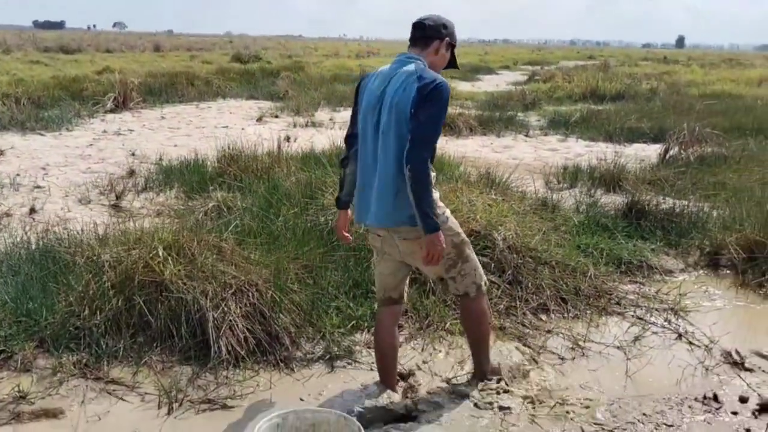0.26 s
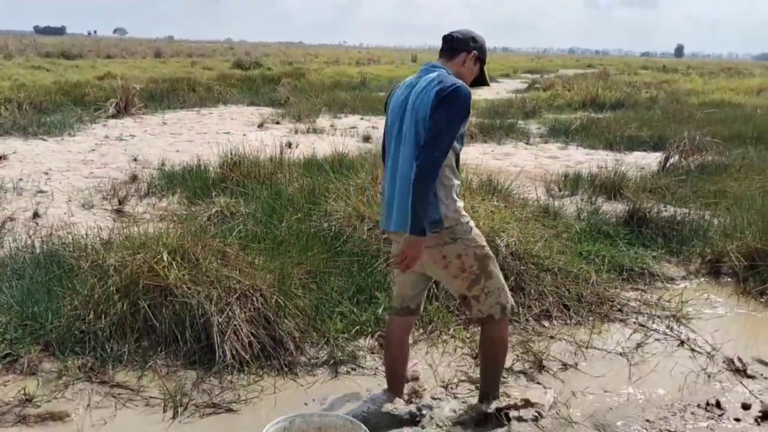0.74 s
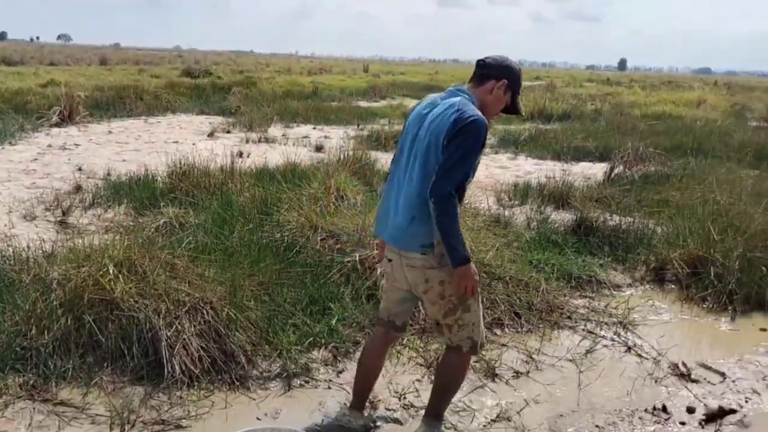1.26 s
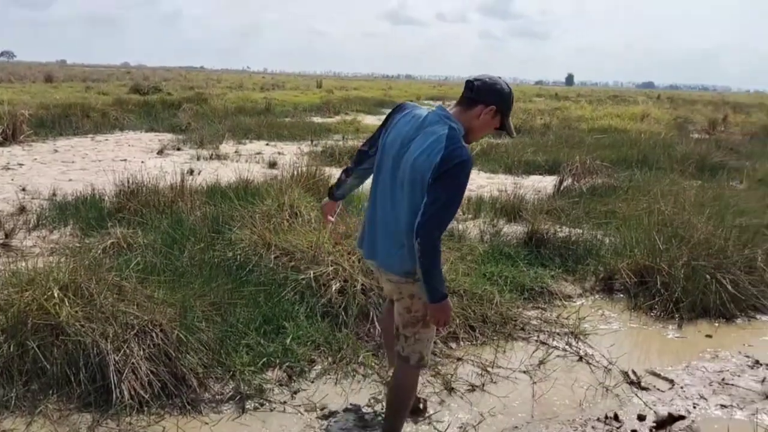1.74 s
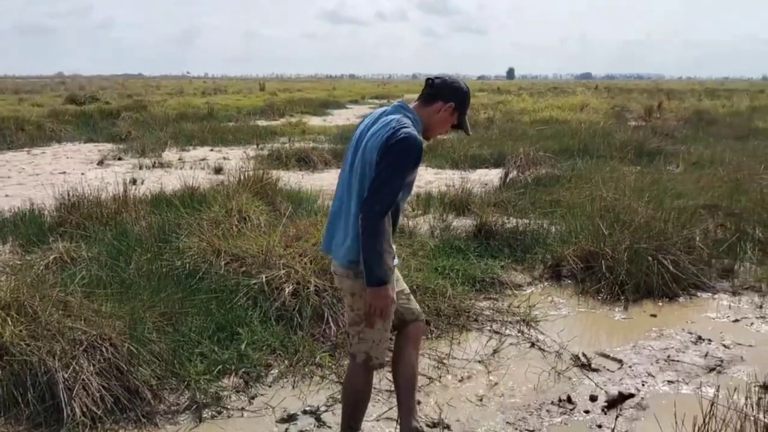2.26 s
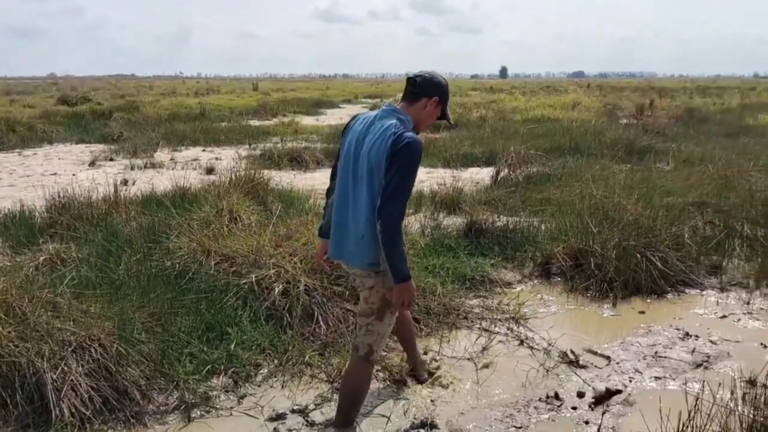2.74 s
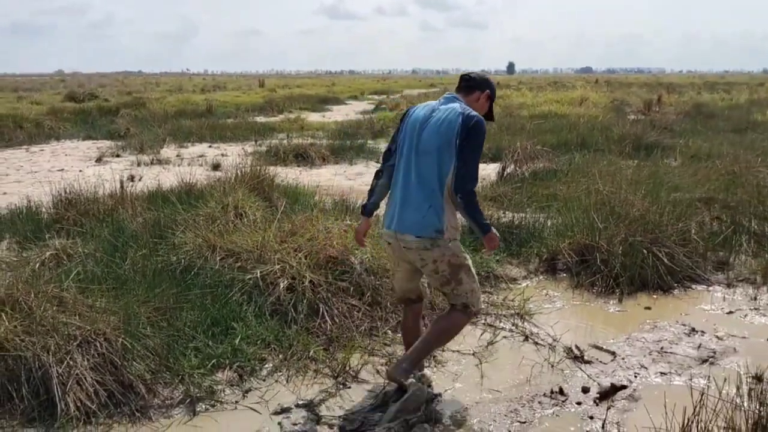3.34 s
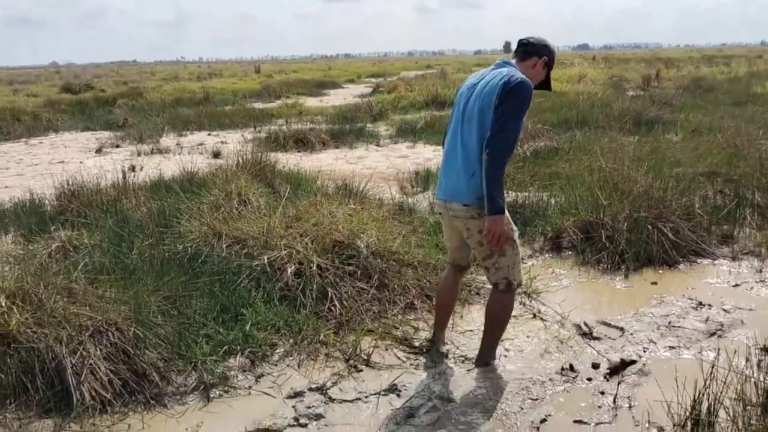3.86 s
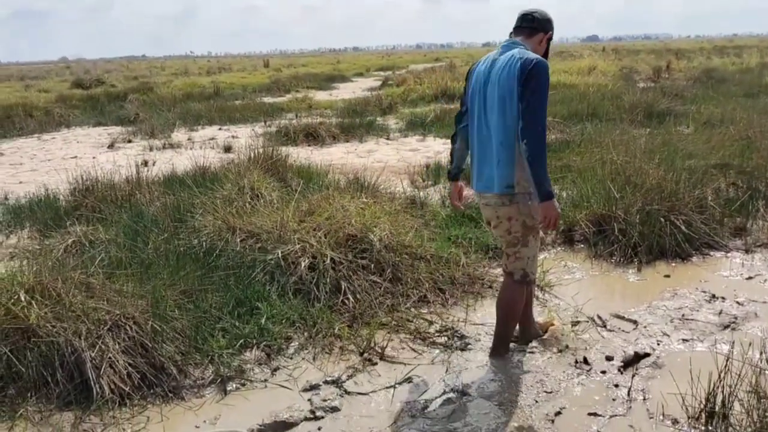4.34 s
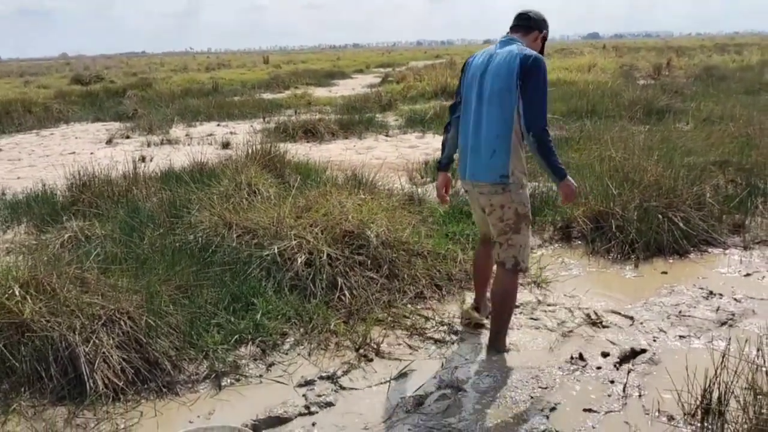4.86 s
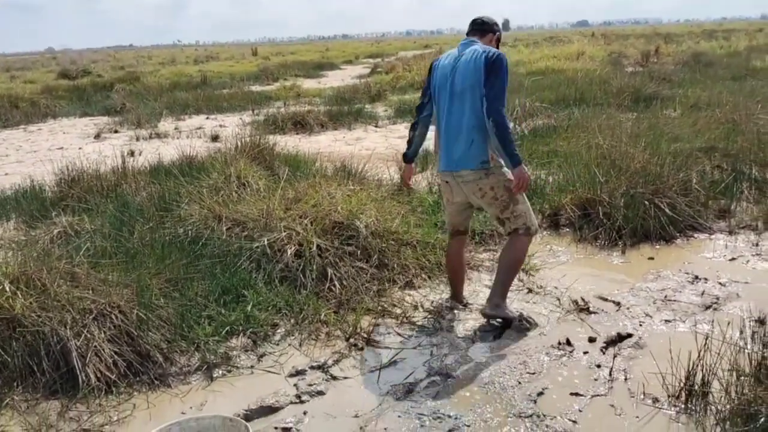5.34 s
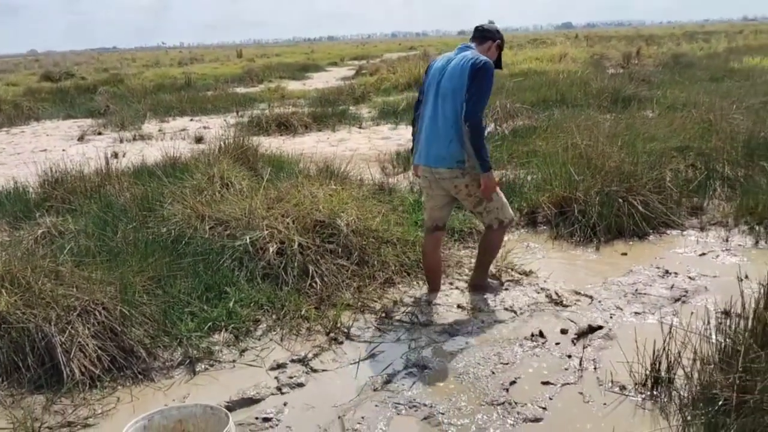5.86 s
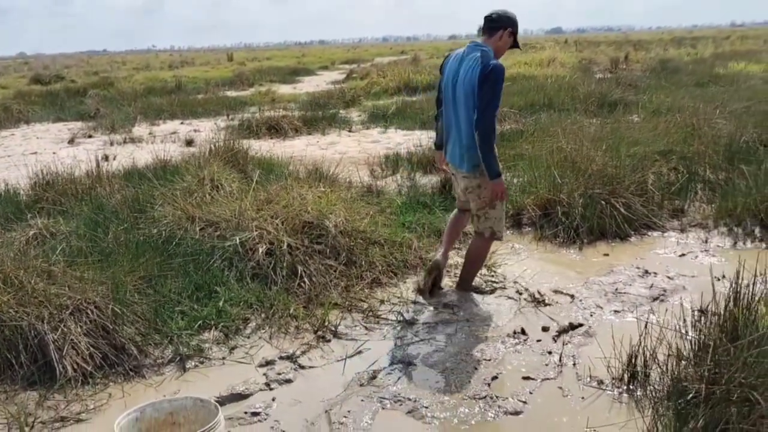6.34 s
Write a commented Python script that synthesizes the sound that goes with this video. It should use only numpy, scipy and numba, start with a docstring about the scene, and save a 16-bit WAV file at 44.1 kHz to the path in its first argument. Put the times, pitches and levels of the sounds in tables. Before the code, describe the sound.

Bare feet wade through shallow muddy water with irregular sloshes, bubbly gulps and drips, while wind rumbles and thumps on the microphone and birds chirp faintly.

```python
"""Wading in an open marsh

Bare feet wade through shallow mud, a few metres from a hand-held phone with two microphone ports.
Pushes through the water raise swarms of ringing bubbles over noise foam, with single pockets, drips and smacks.
Far off, small birds call in gliding near-sine notes. Wind presses on each port as separate bands of noise,
thumps single ports, and twice whistles across the right one as a wavering tone. A faint hiss lies beneath."""
import sys
import numpy as np
from scipy import signal
from scipy.fft import rfft, irfft
from scipy.io import wavfile
from scipy.ndimage import uniform_filter1d
from numba import njit

SR = 44100
rng = np.random.default_rng(int(sys.argv[2]) if len(sys.argv) > 2 else 0)


def waveform_to_disk(signal):
    """Save audio, clipped to [-1, 1], as 16-bit WAV at the path in sys.argv[1]."""
    frames = np.transpose(np.atleast_2d(signal))
    scaled = np.clip(frames, -1, 1) * 32767
    samples = np.round(scaled).astype(np.int16)
    wavfile.write(sys.argv[1], SR, samples)


N = 291501

# Spectrum of the faint hiss: f/Hz, level/dB per Hz (relative)
HISS_SPECTRUM = [(410, -17), (700, 1), (767, -24), (2890, -23.5), (5540, -16), (6310, -17), (15700, -14.5)]
# Spectrum of the wind pressing on a port: f/Hz, level/dB per Hz (relative)
WIND_SPECTRUM = [(8.8, -46), (15, -6), (43, 3.5), (69, 1.5), (119, -6), (200, -19.5), (260, -31),
                 (440, -120)]
# Wind on each port, left then right: t/s, rumble level/dB, buffeting against the rumble/dB
GUSTS = [
    [(0, -35.5, -3.5), (.25, -31, -3.5), (.37, -44.5, -7), (.5, -41, -6), (.65, -43.5, -6), (.8, -32.5, -8),
     (1.15, -30, -5.5), (1.9, -33.5, -4.5), (2.15, -43.5, -2), (2.4, -34.5, -4), (2.55, -39, -5),
     (3.3, -38.5, -8.5), (3.65, -51, -6), (3.85, -58.5, 7), (4.05, -43, -7), (4.3, -47, -19),
     (4.45, -40, -2), (4.85, -36.5, -5), (5.05, -37, -11), (5.35, -52, -4.5), (5.75, -42, -11),
     (5.95, -35, -1), (6.2, -31.5, -3.5), (6.61, -38.5, -4.5)],
    [(0, -36.5, -2.5), (.37, -47.5, -4.5), (.5, -30, 1), (.57, -30, -1.5), (.64, -31.5, 4.5), (.71, -33, 3),
     (.77, -36, 1.5), (.87, -34, 3), (1.0, -31.5, 0), (1.5, -38, 0), (2.05, -33.5, -9), (2.37, -41.5, -5),
     (2.55, -29.5, -6), (2.8, -37.5, -10.5), (3.22, -39.5, -7.5), (3.35, -31.5, -7), (3.55, -45, -15),
     (3.92, -42.5, -12), (4.0, -32, -4.5), (4.2, -37.5, -6.5), (4.6, -37, -2), (5.0, -36, -10),
     (5.19, -41.5, -8), (5.27, -48, -4), (5.57, -39.5, -11.5), (5.66, -32, -8), (5.9, -33.5, -5),
     (6.05, -36.5, -5), (6.45, -34.5, -9.5), (6.55, -24, 5), (6.585, -27, -3), (6.6, -46, -2)],
]
# Two whistles at the right port, before wavering: t/s, f/Hz, level/dB
WHISTLES = [
    [(0.33, 175, -47.5), (0.392, 192, -50.5), (0.442, 210.4, -54), (0.48, 240, -43)],
    [(1.07, 311.3, -48), (1.214, 329.6, -44), (1.236, 280.3, -39.5), (1.3, 274, -43.5), (1.344, 303, -44),
     (1.414, 313, -47), (1.44, 282, -47), (1.5, 305.6, -45.5), (1.52, 341, -69)],
]
# Partials of the whistle, from the fundamental up: level/dB
WHISTLE_PARTIALS_DB = [-0.5, -12.5, -29]
# Single eddies that thump one port: port (0 left, 1 right), t/s, peak level/dB, f/Hz, swell/ms
PUFFS = [(0,.497,-22,100,7.3),(0,0.82,-23,86,7.2),(0,1.158,-17.5,82,6),(0,1.591,-22,100,5.2),(0,1.792,-27,66,9.5),(0,4.807,-21,98,5.7),
         (0,6.071,-20,116,6.3),(0,6.166,-16.5,102,7.2),(1,.4946,-29,285,2.6),(1,0.55,-20,80.5,8.2),(1,.6116,-27,241,8.4),(1,0.6,-26,104,6),(1,.68,-34,427,4.2),
         (1,.8599,-26.5,367,5.4),(1,1.021,-19.5,96,8),(1,1.0679,-30.5,322,3.7),(1,1.2221,-33,318,3.3),(1,2.083,-18.5,73,9.2),
         (1,2.542,-11,84.7,7.1),(1,2.605,-17.5,103,8),(1,2.732,-21,74,7),(1,3.689,-33,85,8),(1,3.99,-19.5,77,6.1),(1,5.179,-24,96,6.2),
         (1,5.667,-18.5,82,9.9),(1,5.862,-18,74,8),(1,5.977,-20,80,7.4),(1,6.319,-17.5,72.5,8.4),(1,6.525,-28,228,3.8),(1,6.5518,-19,200,11),(1,6.556,-30,345,6),(1,6.585,-25,297,4.2),(1,6.557,-7,117,8.6)]
# Pitch pattern of each kind of bird note: share of the note length, f/Hz (before a small random shift)
NOTES = {"fall": [(0, 6950), (.3, 5950), (1, 5250)], "hook": [(0, 4050), (.6, 4430), (.72, 3900),
         (1, 3000)], "drop": [(0, 5230), (.4, 4730), (1, 3200)], "slide": [(0, 5500), (1, 4800)],
         "tick": [(0, 4480), (.5, 5030), (1, 4550)], "dip": [(0, 7200), (1, 6100)], "high": [(0, 8300),
         (.45, 6940), (1, 6400)]}
# Length of each kind of bird note: length/s
NOTE_S = {"fall": .04, "hook": .033, "drop": 0.018, "slide": 0.05, "tick": 0.012, "high": .039, "dip": .022}
# Calls of each kind of note: t/s, level/dB (before roughening)
CALLS = { "fall": [(.665, -64), (.835, -64.5), (1.012, -62), (1.163, -67), (1.322, -66), (1.476, -67),
         (1.64, -64)], "slide": [(2.395, -65)], "drop": [(2.535, -78.5), (2.732, -57), (2.92, -58),
         (3.114, -61)], "hook": [(1.215, -70), (1.418, -64.5), (1.789, -54), (1.975, -53), (2.168, -56),
         (2.36, -59), (2.559, -53.5), (2.755, -52.5), (2.946, -55.5), (3.135, -54.5)],
         "tick": [(2.528, -60), (2.545, -54.5), (2.565, -58), (2.585, -60), (3.222, -71), (2.688, -66.5),
         (2.704, -64), (2.722, -62), (2.892, -59), (2.912, -60), (2.932, -54), (3.058, -59), (3.075, -56),
         (3.094, -63), (3.113, -58), (3.24, -59)], "high": [(5.88, -52.5)], "dip": [(.478, -52.5)]}
# Spectrum of bubbles and foam in the water: f/Hz, level/dB per Hz (relative)
WATER_SPECTRUM = [(180, 11), (300, -15.5), (378, -9.5), (510, -19.5), (643, -6), (810, -0.5), (1070, -10),
                  (1190, -9), (1330, -8.5), (3050, -12.5), (3650, -16.5), (9240, -30.5), (12900, -32.5),
                  (15700, -39.5)]
# Drops that smack the surface: t/s, level/dB, centre f/Hz, bright edge against the body/dB
SMACKS = [(.025, -35.5, 3680, -10), (.083, -38.5, 3930, -15), (.174, -37.5, 3180, -7),
          (0.378, -45.5, 5730, -7), (0.5362, -43, 3500, -16), (.7728, -43.5, 3870, -21),
          (0.884, -40, 3300, -17), (.908, -42, 3820, -9), (0.9403, -36.5, 3700, -7),
          (1.0435, -46, 6000, -16), (1.1672, -50, 5500, -18), (1.27, -54, 6500, -6),
          (1.511, -42.5, 3330, -26), (1.67, -41.5, 3220, -8), (1.732, -44, 3520, -6),
          (1.9505, -47, 3300, 3), (1.9725, -27.5, 3270, -15), (2.086, -45, 3320, -22),
          (2.148, -36, 3560, -30), (2.4598, -39, 4320, -19), (2.5145, -33, 5200, -26),
          (2.7942, -39.5, 4070, -12), (2.81, -41.5, 3650, -11), (3.2982, -42, 3340, -22),
          (3.3872, -38.5, 3280, -14), (3.5944, -39, 3360, -25), (3.627, -36, 4030, -25),
          (3.817, -38, 3120, -9), (4.0427, -45, 3260, -17), (4.2, -42, 3720, -21), (4.2315, -46, 3300, -16),
          (4.2925, -49.5, 3230, -3), (4.554, -38, 6500, -37), (4.7515, -51, 4960, -8),
          (4.827, -46.5, 4870, -4), (4.9796, -48, 3200, -9), (5.0985, -44, 3365, -25),
          (5.127, -42, 4100, -25), (5.1964, -43, 3910, -7), (5.5235, -37.5, 3220, -6),
          (5.584, -39, 3310, -14), (5.658, -38, 3320, -12), (6.3705, -47.5, 3300, -21),
          (6.393, -37.5, 3130, -28), (6.407, -38, 3750, -25)]
# Drips whose cavity closes, so the tone climbs: t/s, peak level/dB, start f/Hz, swell/ms, glide/share per cycle
DRIPS = [(.244, -38.5, 1400, 4.2, .035), (.729, -39.5, 1010, 4.1, 0.044), (1.303, -55, 2180, 3.9, 0.013),
         (1.459, -47.5, 810, 6, 0.034), (2.412, -44.5, 1369, 5.2, 0.024), (2.648, -55, 727, 5.7, 0.049)]
# Large bubbles and deep gulps: t/s, peak level/dB, f/Hz, swell/ms
BUBBLES = [(.0959, -37, 2000, 1.1), (.1185, -38, 2210, 2.4), (.1036, -29.5, 1790, 0.44),
           (.1405, -27, 830, 3.7), (.1667, -29.5, 2100, 1), (.1662, -35, 774, 2.8),
           (.1751, -22.5, 2860, 0.88), (.1032, -37, 503, 1.6), (.1783, -27.5, 333, 3.1),
           (.194, -34, 350, 4.7), (.2208, -39, 780, 3.3), (.7163, -44, 1060, 1.7), (.755, -27.5, 740, 1.46),
           (.7938, -37, 760, 5), (.8548, -31.5, 650, 2.1), (.8877, -36.5, 1010, 1.6),
           (.9212, -34.5, 860, 2.6), (.9492, -32.5, 1780, .81), (.9689, -38.5, 940, 1.7),
           (1.0337, -47, 843, 5.3), (1.131, -46, 920, 1.9), (1.5234, -33.5, 283, 3),
           (1.528, -28, 880, 0.87), (1.632, -36.5, 740, 2.2), (1.6428, -30, 743, 3.6),
           (1.8498, -39, 1680, 1.3), (1.9169, -40, 2790, 0.82), (1.9192, -40.5, 875, 5.1),
           (1.9623, -37, 1610, 2.7), (1.9775, -28, 2730, 0.58), (2.0961, -39.5, 1650, 1.3),
           (2.1056, -34.5, 1730, 0.34), (2.255, -34, 2800, 0.72), (2.3675, -43.5, 1300, 0.61),
           (2.392, -45, 2430, 1.3), (2.4816, -44.5, 1910, 2.2), (2.5673, -46, 2560, 0.9),
           (2.8151, -35.5, 1480, 1.1), (2.8231, -38, 1230, 2), (3.2748, -31, 990, 1.4),
           (3.28, -42.5, 426, 5.9), (3.345, -42, 400, 5.5), (3.488, -42, 700, 3), (3.55, -40, 450, 1.5),
           (3.6324, -38.5, 640, 2.6), (3.74, -43, 760, 3.3), (3.3054, -33, 1670, 0.99),
           (3.3244, -36.5, 900, 5.3), (3.3994, -36.5, 380, 2.5), (3.6264, -41, 1930, 0.76),
           (3.6657, -34, 3000, 0.86), (3.8198, -28.5, 2630, 0.39), (4.0474, -36, 1580, 0.55),
           (4.0562, -34, 804, 3.7), (4.0614, -41.5, 408, 3.7), (4.2003, -35.5, 784, 2.2),
           (4.2008, -41, 2200, 1.1), (4.291, -38.5, 1100, 1.3), (4.2911, -38, 2360, .5),
           (4.3116, -44, 750, 1.9), (4.3605, -36, 1630, 0.81), (4.4521, -34.5, 644, 4),
           (4.5532, -33.5, 506, 0.86), (4.5542, -33.5, 850, 2), (4.5915, -40, 1200, 2.2),
           (4.6115, -41, 1450, 1.4), (4.6373, -43, 2440, 1.8), (4.6752, -37.5, 940, 1.9),
           (4.9887, -39.5, 1630, .93), (5.0578, -39.5, 1100, 2.2), (5.1437, -32.5, 870, 2.1),
           (5.1807, -39, 1480, 3.2), (5.1964, -35.5, 1830, 2.8), (4.5334, -44.5, 287, 5.4),
           (4.99, -46.5, 353, 3.4), (5.105, -44.5, 333, 2.9), (5.2019, -38, 890, 1.1),
           (5.2423, -42, 894, 3.2), (5.4074, -41.5, 870, 2), (5.3896, -38.5, 1870, .49),
           (5.5356, -30.5, 845, 2.5), (5.5539, -36, 2690, 1.1), (5.56, -35, 687, 5.6),
           (5.6047, -31, 813, 2.1), (5.6583, -25.5, 2000, 0.32), (5.7063, -44, 670, 2.2),
           (5.7522, -39, 1670, 1.3), (5.7575, -29, 690, 1.9), (5.7675, -33, 760, 2.5),
           (6.1814, -41, 1600, 1.3), (6.3758, -36, 1350, 0.97), (6.3903, -29, 930, 1.7),
           (6.3936, -25, 1570, 0.55), (6.4112, -23, 780, 2.36), (6.4132, -41, 1850, 1.2),
           (6.4608, -41, 1105, 2.6), (6.5297, -42, 2300, 1.7)]
# Each push of a foot through the water: start t/s, rise/s, slosh level/dB, fall/dB per s,
# splash against slosh/dB, spray against slosh/dB
PUSHES = [(-.05,0.028,-48.5,34,-2.5,-4),(.1,0.04,-42,78,-4,-15.5),(.19,0.022,-47.5,153,-4,-12),(.29,0.031,-54,65.5,-9,-5.5),(.42,0.028,-56.5,88,-5.5,-11),
          (0.659,0.067,-48,33,-7,-11.5),(.86,0.066,-49.5,216,2.5,-2),(1.01,0.028,-55,204,-3,-9),(1.11,0.021,-66.5,154.5,-5,-9),
          (1.499,0.025,-43.5,78,-7.5,-13),(1.61,0.031,-48.5,154,-17,-5),(1.779,0.12,-52,65,5.5,-1.5),(1.939,0.022,-46,156,-4,-3),
          (2.05,0.036,-57,80,5.5,6),(2.13,0.018,-60.5,63,-4,7),(2.2,0.14,-66.5,74,7,13),(2.5,0.16,-80,20,11,18),(2.77,0.041,-57,143,6,5),(2.85,0.22,-55.5,41,-7,-7),
          (3.249,0.034,-42.5,44,-3.5,-9.5),(3.4,0.098,-48.5,48,-1,-1.5),(3.55,0.055,-50.5,70,1.5,-9),(3.72,0.042,-53,127.5,3.5,-1),
          (4.035,0.014,-44.5,300,-4.5,-10),(4.09,0.026,-63,100,2,-2),(4.19,0.0098,-59,197,3.5,-1),(4.275,0.013,-54.5,154,3.5,-1),(4.32,0.036,-58,117,6,-5),(4.45,0.096,-47,123,-7,-12.5),(4.558,0.12,-48,241,-2,-3),
          (4.72,0.16,-59,17,1.5,-5),(5.0,0.094,-48,67,-5,-3),(5.16,0.029,-53,73,-4,-3.5),(5.3,.1,-54.5,30,-6.5,-10.5),(5.498,0.028,-44.5,61,-4.5,-9),(5.58,0.025,-45.5,39,-6.5,-12),(5.71,0.033,-44,62,-8,-17),
          (5.93,0.079,-51,105,-1.5,-3.5),(6.13,0.056,-59.5,105,-7,-19),(6.364,0.023,-42,150,0,-13),(6.43,0.04,-47.5,183,-6,-7.5),(6.5,0.016,-61.5,107,-4,2)]

HISS_DB = -75  # mean level, before a slow wander
FLUTTER_DB, FLUTTER_PER_BUFFET = -14.5, 1.81  # flutter against the rumble, growing faster than the buffeting
SMACK_T60_S = 0.024
SPLITS_HZ = 300, 1300, 2950, 20000  # slosh, splash and spray lie between these
STILL_DB = -76.5, -72.5, -77.5  # slosh, splash and spray of the water at rest
RISE_DB = 21.5  # how far below its top a push is, one rise time earlier
SPLASH_FALL, SPRAY_FALL = 0.96, 0.89  # finer drops settle more slowly: share of the fall rate
PORT_LAG, LAG_SPREAD = 2.4, 3.2  # samples by which the left port hears later, and the scatter over directions
NOTCH_HZ, NOTCH_WIDTH_HZ, NOTCH_DEPTH = 2890, 217, 0.73  # depth: share of amplitude taken out at the centre
CEILING = 0.81  # amplitude that the strongest gusts round off towards
TOP_HZ = 15850  # upper edge of the phone's pass band


def undb(db):
    """Gain of a level in dB."""
    return 10 ** (np.asarray(db) / 20)


def unit(x):
    """Scaled to rms 1."""
    return x / np.sqrt(np.mean(x ** 2))


def columns(table):
    """Each column after the time, interpolated to every sample."""
    s, *rest = np.transpose(table)
    return [np.interp(np.arange(N) / SR, s, c) for c in rest]


def shade(table, hz):
    """Level in dB of a spectrum at these frequencies, joined on a log frequency axis."""
    f, db = np.transpose(table)
    return np.interp(np.log(np.maximum(hz, 1)), np.log(np.maximum(f, 1)), db)


def band(x, lo_hz, hi_hz, order=2):
    """Band-pass."""
    sos = signal.butter(order, [lo_hz, min(hi_hz, .48 * SR)], "band", fs=SR, output="sos")
    return signal.sosfilt(sos, x)


def coloured(table):
    """Two unrelated noises with this spectrum."""
    white = rfft(rng.standard_normal((2, N)))
    hz = np.arange(N // 2 + 1) * SR / N
    return irfft(white * undb(shade(table, hz)), N)


def walk(rate):
    """Random levels held 1 / rate s and slewed twice; rms 1."""
    k = int(SR / rate)
    held = np.repeat(rng.standard_normal(N // k + 1), k)
    slewed = uniform_filter1d(uniform_filter1d(held, k), k)
    return unit(slewed[:N])


def foam(table):
    """Noise of countless tiny sources; the ports agree in the bass only."""
    low, high = (signal.butter(2, 2800, kind, fs=SR, output="sos") for kind in ("low", "high"))
    shared = signal.sosfilt(low, coloured(table)[0])
    bass = np.array([np.roll(shared, 2), shared])  # left 2 samples later
    return bass + signal.sosfilt(high, coloured(table))


@njit
def rings(n, start, hz, swell, glide, size, lag):
    """Short tones that swell for swell s, die away and drift in pitch; the left port hears them lag samples later."""
    out = np.zeros((2, n))
    for g in range(len(hz)):
        for c in range(2):
            t0 = start[g] * SR + (.5 - c) * lag[g]
            i0 = int(t0) + 1
            for i in range(max(i0, 0), min(n, i0 + int(5 * swell[g] * SR))):
                t = (i - t0) / SR
                turns, u = hz[g] * t, t / swell[g]
                envelope = u * u * np.exp(2 - 2 * u)
                phase = 2 * np.pi * turns * (1 + .5 * glide[g] * turns)
                out[c, i] += size[g] * envelope * np.sin(phase)
    return out


def pops(table):
    """Single air pockets, a few cycles each; without a glide of their own they drift by chance."""
    s, db, hz, swell_ms, *glide = np.array(table, float).T
    glide = glide[0] if glide else 0.0029 + 0.0095 * rng.standard_normal(len(s))
    swell_s = np.clip(swell_ms, .2, 18) / 1000
    return rings(N, s, hz, swell_s, glide, undb(db), PORT_LAG + 0 * s)


def hiss():
    """Faint coloured noise at both ports, its level wandering slowly."""
    return undb(HISS_DB + walk(6.52)) * unit(foam(HISS_SPECTRUM))


def wind():
    """Eddies press on each port on their own: slow rumble, faster buffeting and a lumpy flutter on top."""
    db, buffet_db = np.transpose([columns(port) for port in GUSTS], axes=(1, 0, 2))
    rumble = unit(band(coloured(WIND_SPECTRUM), 13.6, 71.8)) * undb([3.2 * walk(12), 2.56 * walk(19)])
    buffet = unit(band(coloured(WIND_SPECTRUM), 71, 340)) * undb([3.15 * walk(20), 2.35 * walk(22.32)])
    flutter_noise = band(rng.standard_normal((2, N)), 154, 370)
    flutter = unit(flutter_noise * undb([3.5 * walk(35), 5.5 * walk(35)]))
    flutter_db = FLUTTER_DB + FLUTTER_PER_BUFFET * buffet_db
    lumps_db = np.array([1.67 * walk(9), 1.14 * walk(9)])  # one per port, common to its three layers
    return undb(db + lumps_db) * (rumble + undb(buffet_db) * buffet + undb(flutter_db) * flutter)


def puffs():
    """Single eddies thump as short low tones, each on its own port."""
    rows = np.array(PUFFS)
    return np.array([pops(rows[np.round(rows[:, 0]) == port, 1:])[port] for port in range(2)])


def whistle():
    """Air shedding off the edge of the right port: a wavering tone with weak overtones."""
    out = np.zeros((2, N))
    t = np.arange(N) / SR
    for table in WHISTLES:
        hz, db = columns(table)
        on = np.clip(np.minimum(t - table[0][0], table[-1][0] - t) / 0.01, 0, 1)  # 10 ms fades
        waver = 1 + .035 * walk(45) + .03 * walk(150)
        phase = 2 * np.pi * np.cumsum(hz * waver) / SR
        tone = sum(undb(d) * np.sin((k + 1) * phase) for k, d in enumerate(WHISTLE_PARTIALS_DB))
        out[1] += on * undb(db + 2.8 * walk(45)) * tone
    return out


def birds():
    """Near-sine notes, each a slightly shifted copy of its pattern, off to one side and blurred by the reeds."""
    out = np.zeros((2, N))
    for kind, calls in CALLS.items():
        share, pitch = np.transpose(NOTES[kind])
        length = NOTE_S[kind]
        for s, db in calls:
            u = np.arange(int(length * SR)) / (length * SR)
            hz = np.interp(u, share, pitch) * (1 + .008 * rng.standard_normal())
            phase = 2 * np.pi * np.cumsum(hz) / SR
            both = np.sin(phase + np.array([[-.7], [.7]]))  # the left port lags in phase
            i = int(s * SR)
            out[:, i:i + len(u)] += undb(db) * np.sin(np.pi * u) ** .45 * both
    t = np.arange(2048) / SR
    reeds = undb(-33) * rng.standard_normal((2, len(t))) * np.exp(-t / .006)
    rough = undb(2.5 * walk(250))
    return out * rough + signal.fftconvolve(out, reeds, axes=1)[:, :N]


def smacks():
    """Drops strike the surface: short bursts of noise around a centre, with a thin bright edge."""
    out, t = np.zeros((2, N + 2048)), np.arange(2048) / SR
    shape = np.exp(-np.log(1000) * t / SMACK_T60_S) * (1 - np.exp(-t / .0013))
    for s, db, hz, top_db in SMACKS:
        both, left, right = rng.standard_normal((3, len(t)))
        noise = np.array([np.roll(both, 2) + 0.88 * left, both + 1.13 * right])
        body = unit(band(noise, hz / 2.46, hz * 1.28))
        edge = unit(band(np.array([left, right]), 11000, 14800))
        burst = (body + undb(top_db) * edge) * shape
        # the strength of the blow sets the energy of the burst
        burst = unit(burst) * np.sqrt(np.mean(shape ** 2))
        i = int(s * SR)
        out[:, i:i + len(t)] += undb(db) * burst
    return out[:, :N]


def drips():
    """The cavity behind a drip closes, so its ringing tone climbs."""
    return pops(DRIPS)


def large_bubbles():
    """Large trapped air pockets and deep gulps ring for a few cycles each."""
    return pops(BUBBLES)


def swarm(lo_hz, hi_hz, cycles, scatter_db, foam_db, count):
    """Small bubbles at random moments, their sizes spilling a little over the range, a few standing out, over foam."""
    when, pitch, loud, long, drift, side = rng.random((count, 6)).T
    lo, hi = lo_hz / 1.3, min(1.3 * hi_hz, TOP_HZ)
    hz = lo * (hi / lo) ** pitch
    size = undb(shade(WATER_SPECTRUM, hz) - scatter_db * np.log(1 - .995 * loud)) * hz
    size = size / np.sqrt((1 + (lo_hz / hz) ** 6) * (1 + (hz / hi_hz) ** 6))  # weaker outside the range
    stretch = 4 ** (long - .5)  # some ring longer at the same energy
    swell_s = cycles * stretch / hz
    glide = 0.035 * (drift - .3) / stretch
    lag = PORT_LAG + LAG_SPREAD * np.sqrt(12) * (side - .5)
    bubbles = rings(N, when * N / SR, hz, swell_s, glide, size / np.sqrt(stretch), lag)
    fizz = unit(band(foam(WATER_SPECTRUM), lo_hz, hi_hz))
    return unit(unit(bubbles) + undb(foam_db) * fizz)


def pushes(db, fall_share, still_db):
    """Every push swells to its level and dies away; their powers add over the still water."""
    t, power = np.arange(N) / SR, undb(2 * still_db)
    for (s, rise_s, _, fall, *_), top_db in zip(PUSHES, db):
        rise_s = max(rise_s, .005)
        u = t - s - rise_s  # time from the top of the push
        shape_db = np.where(u < 0, RISE_DB * u / rise_s, -fall_share * max(fall, 5) * u)
        power = power + undb(2 * np.maximum(top_db + shape_db, -150))
    return np.sqrt(power)


def water():
    """Slosh, splash and spray rise with each push of a foot and splutter together."""
    _, _, db, _, splash_db, spray_db = np.transpose(PUSHES)
    splutter_db = 0.8 * walk(30) + 1.1 * walk(140) + 0.93 * walk(23)
    slosh = swarm(*SPLITS_HZ[0:2], cycles=2.6, scatter_db=2.5, foam_db=-6, count=3400)
    splash = swarm(*SPLITS_HZ[1:3], cycles=3.8, scatter_db=3.2, foam_db=-7, count=5000)
    spray = swarm(*SPLITS_HZ[2:4], cycles=6, scatter_db=3, foam_db=-3.5, count=20000)
    both = undb(splutter_db) * pushes(db, 1, STILL_DB[0]) * slosh
    both = both + undb(1.1 * splutter_db) * pushes(db + splash_db, SPLASH_FALL, STILL_DB[1]) * splash
    both = both + undb(splutter_db) * pushes(db + spray_db, SPRAY_FALL, STILL_DB[2]) * spray
    return both * undb(np.array([[-.3], [.3]]))  # slightly louder on the right


def scene():
    """Everything that reaches the two ports, from the background to the wading."""
    background = hiss() + wind() + puffs() + whistle() + birds()
    wading = smacks() + drips() + large_bubbles() + water()
    return background + wading


def record(dry):
    """The ports dip in a narrow band; the phone rounds off the strongest gusts and cuts the top."""
    dip = signal.lfilter(*signal.iirpeak(NOTCH_HZ, NOTCH_HZ / NOTCH_WIDTH_HZ, fs=SR), dry)
    soft = CEILING * np.tanh((dry - NOTCH_DEPTH * dip) / CEILING)
    return signal.sosfilt(signal.ellip(16, .3, 90, TOP_HZ, fs=SR, output="sos"), soft)


dry = scene()
out = record(dry)
waveform_to_disk(out)
```